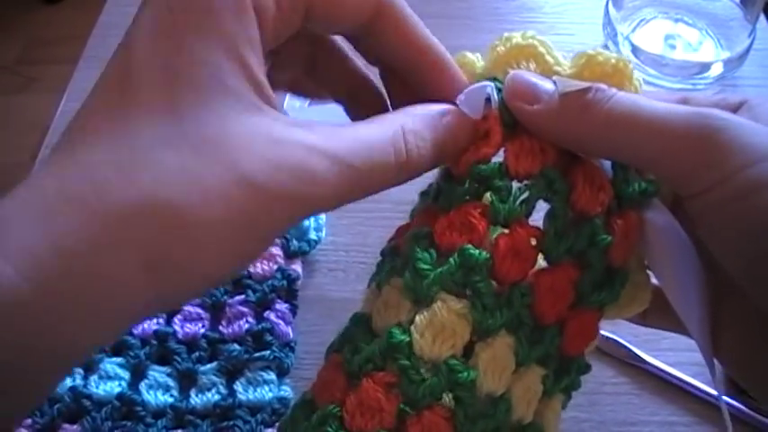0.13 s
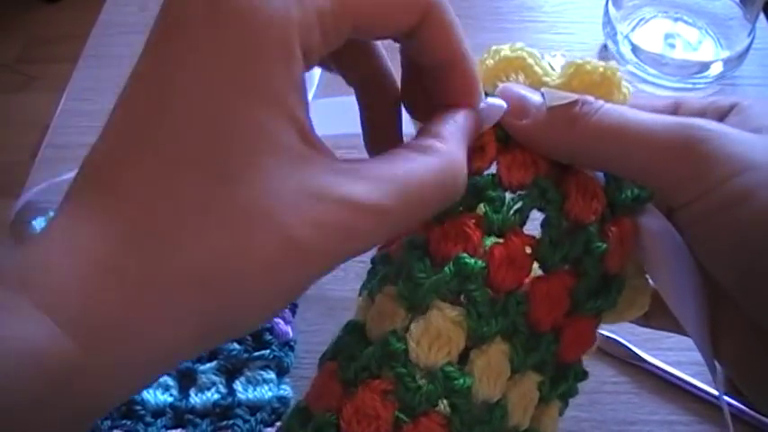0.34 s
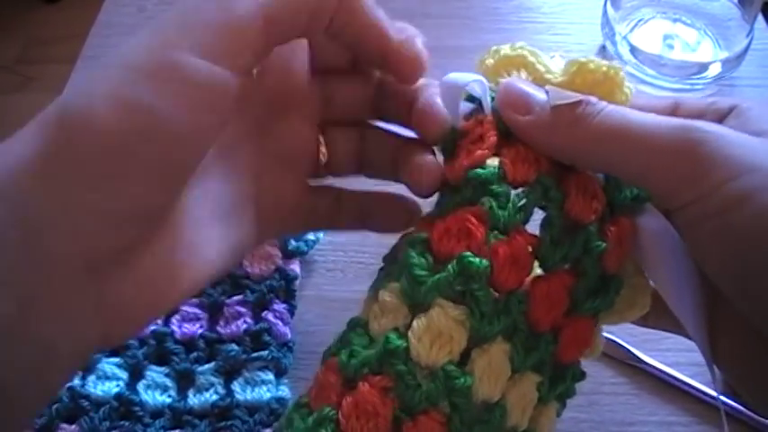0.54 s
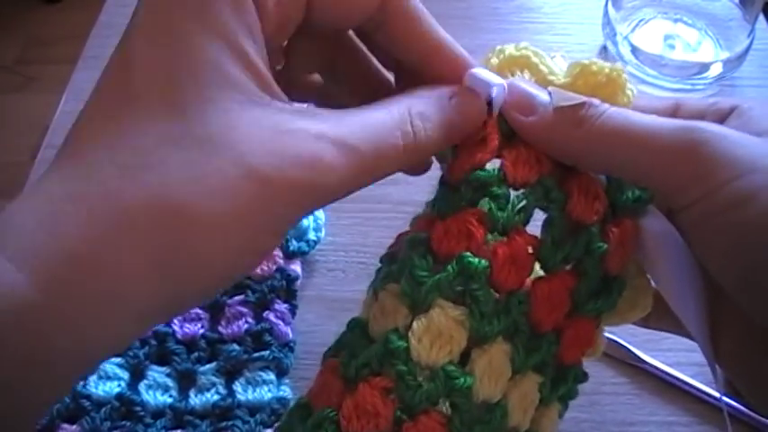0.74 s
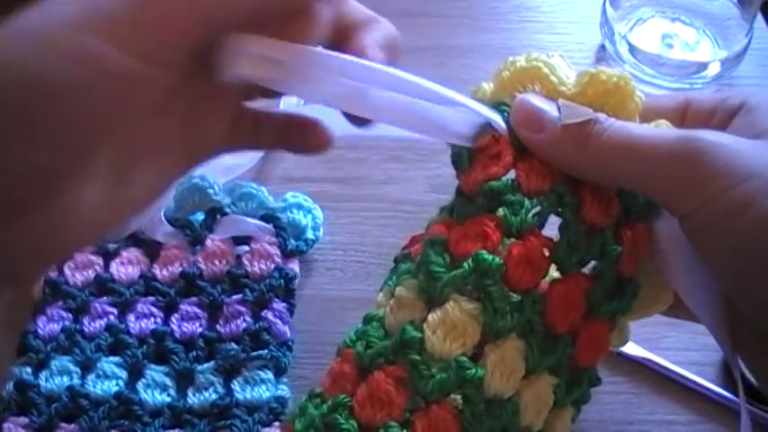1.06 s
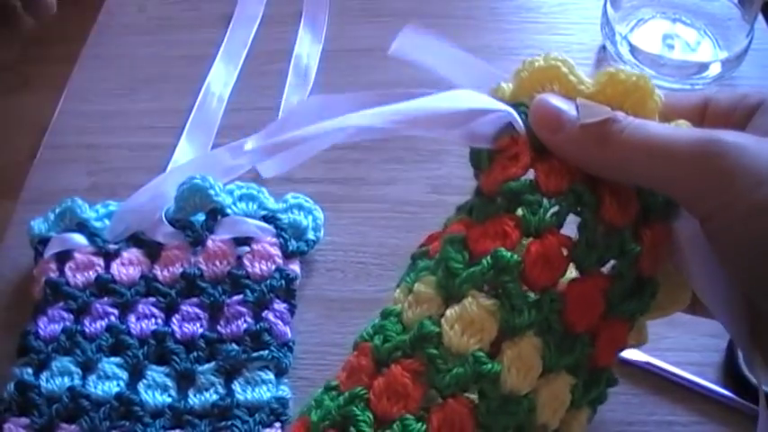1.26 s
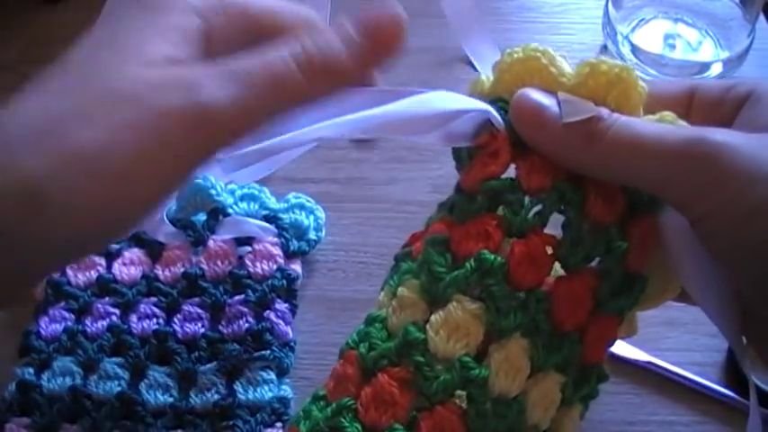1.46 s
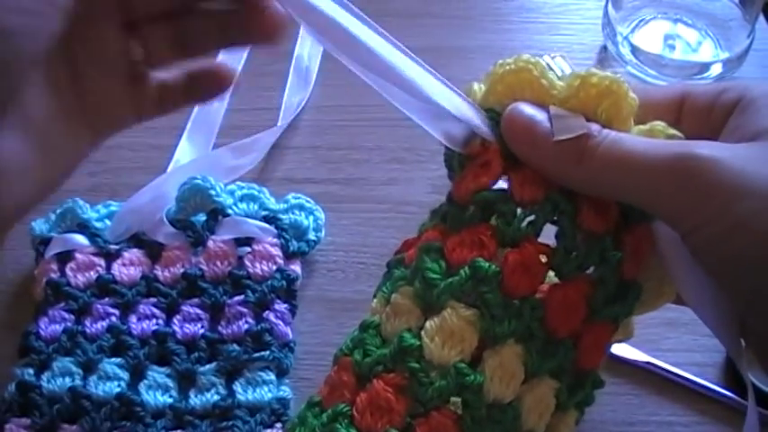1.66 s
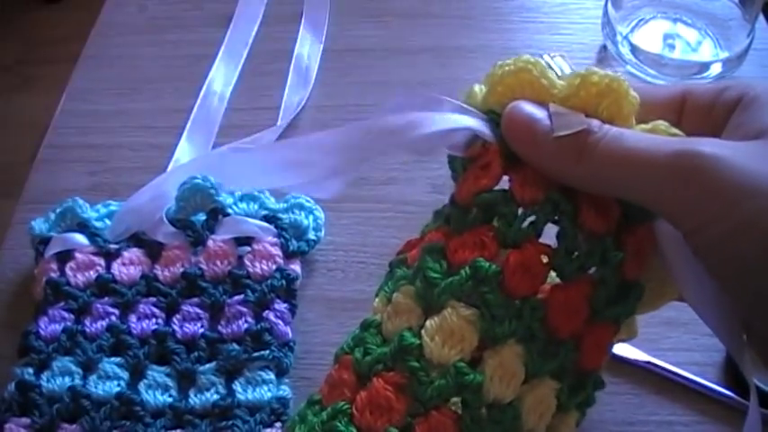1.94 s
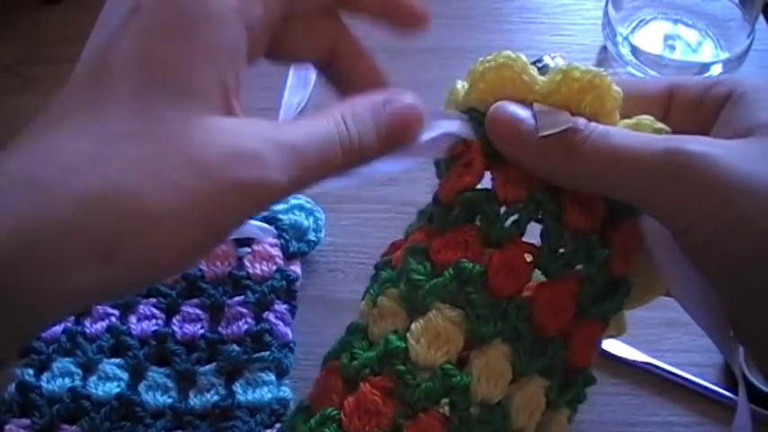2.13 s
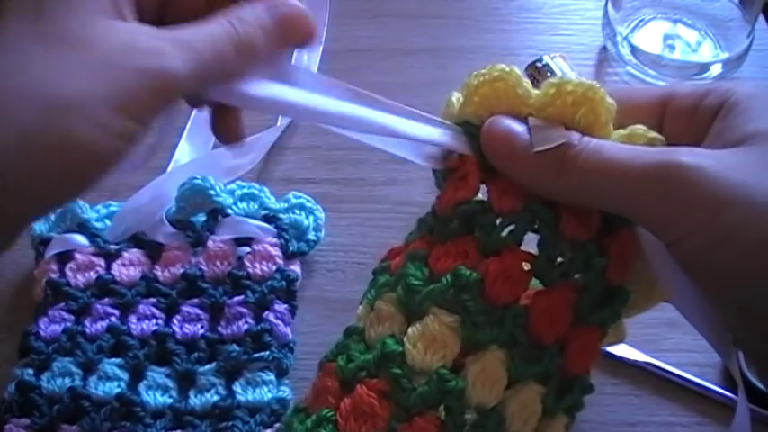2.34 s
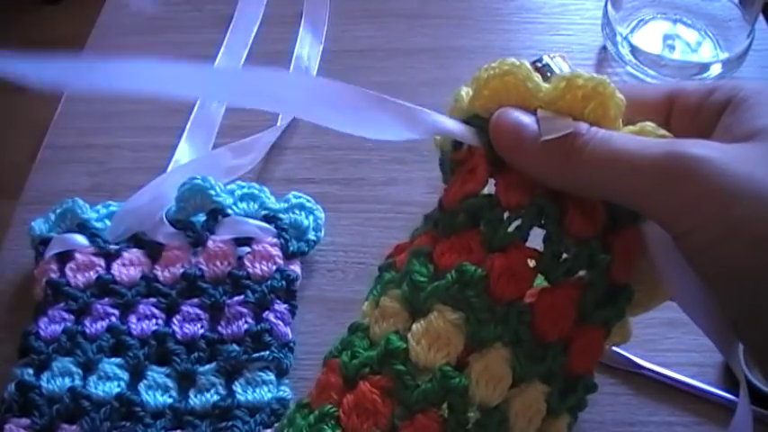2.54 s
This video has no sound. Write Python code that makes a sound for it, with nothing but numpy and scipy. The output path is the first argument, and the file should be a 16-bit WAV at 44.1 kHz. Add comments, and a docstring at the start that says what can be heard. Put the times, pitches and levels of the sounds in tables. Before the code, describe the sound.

Crisp, grainy swishes of satin ribbon drawn through crocheted yarn, with light table taps, indoors.

```python
"""Room tone and the faint whine of a camera's drive run throughout. From the start a satin ribbon is drawn
by hand through crocheted yarn: shaped noise, made grainy by fibres that catch and slip. Knuckles and hook
tap the wooden table as damped tones with a thud. Ticks, ribbon snaps, yarn pops, a brief scrape near 0.56 s
and a soft low puff near 1.2 s are coloured noise puffs. Near 1.9 s a soft low tone swells in a rumble, and
near the end a glass bowl rings once as damped tones. The room answers hands and table with a noise tail."""
import sys
import numpy as np
from scipy import signal
from scipy.fft import rfft, irfft, next_fast_len
from scipy.io import wavfile
from scipy.ndimage import uniform_filter1d, map_coordinates

SR = 44100
rng = np.random.default_rng(int(sys.argv[2]) if len(sys.argv) > 2 else 0)


def gain_from_decibels(decibels):
    """Convert decibel values to linear amplitude factors."""
    exponent = np.asarray(decibels, float) / 20
    return 10 ** exponent


def unload_wav(signal):
    """Save mono or channel-first audio to the path in sys.argv[1] as 16-bit WAV at rate SR, clipped to [-1, 1]."""
    wavfile.write(
        sys.argv[1],
        SR,
        np.round(np.clip(np.atleast_2d(signal).T, -1, 1) * 32767).astype(np.int16),
    )


N = 119070  # length in samples, 2.7 s


def unit(x):
    """Scales a signal to an rms of 1."""
    return x / np.sqrt(np.mean(x ** 2) + 1e-20)


def along(points, hz):
    """Reads a curve of (hz, value) points on a logarithmic frequency axis."""
    point_hz, value = np.transpose(points)
    return np.interp(np.log(hz + 1), np.log(point_hz + 1), value)


def wobble(rate):
    """A smooth random curve through `rate` random points a second."""
    knots = rng.standard_normal(int(N * rate / SR) + 4)
    return map_coordinates(knots, [np.arange(N) * rate / SR])


def filtered(x, response):
    """Filters x by a (possibly complex) gain for each frequency."""
    size = next_fast_len(N + SR // 2)
    gain = response(np.fft.rfftfreq(size, 1 / SR))
    return irfft(rfft(x, size) * gain, size)[..., :N]


def peak(f, hz, wide_hz):
    """Response of a resonance at hz, about wide_hz wide, that rings only after it is struck."""
    return 1j * f * wide_hz / (hz * hz - f * f + 1j * f * wide_hz)


def rush(spectrum, side_db, patchy_db, grain=1):
    """Coloured stereo noise, mid rms 1, with random loud and soft patches in time and pitch."""
    z = signal.stft(rng.standard_normal((2, N)), nperseg=256)[2]
    patches = uniform_filter1d(rng.standard_normal(z.shape[1:]), 4, 0)  # smooth over frequency
    patches = uniform_filter1d(patches, 8, 1)  # smooth over time
    patchy = signal.istft(z * gain_from_decibels(patchy_db * unit(patches)), nperseg=256)[1][:, :N]

    def colour(hz):
        return gain_from_decibels(along(spectrum, hz)) * [hz ** 0, gain_from_decibels(along(side_db, hz))]

    mid, side = filtered(grain * patchy, colour)
    return np.array([mid + side, mid - side]) / np.sqrt(np.mean(mid ** 2))


# Colour of the quiet room: hz, level_db (per Hz, relative)
ROOM_COLOUR = [(25, -36), (120, -15.5), (212, -9), (560, -5.5), (1260, -4.5), (1900, -9.5), (2160, -8),
               (2800, -12), (3500, -13), (4600, -16), (7500, -15), (11000, -20.5), (15000, -34),
               (16000, -32)]
# Stereo width of room tone and rumble: hz, side_over_mid_db
ROOM_WIDTH = [(60, -18), (110, 9), (200, 9), (380, 10.5), (700, 9), (1290, 5), (2380, 4.5), (4400, 3.5),
              (8120, -2), (15000, 3)]


def room_tone():
    """The steady hush of the room, as wide coloured noise."""
    return gain_from_decibels(-67.5) * rush(ROOM_COLOUR, ROOM_WIDTH, patchy_db=1.9)


# Tones of the camera's drive: pitch_hz, level_db (before a 6 dB lift)
DRIVE_TONES = [(727, -85.5), (1459, -82.5), (2186, -78.5), (3644, -84), (15622, -93)]


def drive_whine():
    """The drive's thin tones, each slightly unsteady in level and phase."""
    t = np.arange(N) / SR
    whine = 0
    for hz, db in DRIVE_TONES:
        level = gain_from_decibels(db + 6.0 + 0.66 * wobble(12.9))
        turns = hz * t + rng.random() + 0.016 * wobble(19)
        whine = whine + level * np.sin(2 * np.pi * turns)
    return whine


def slips():
    """Fibres catching: tension builds and lets go at once, in uneven sizes, over a steady share."""
    slips_per_s, build_s, spread_db, share = 1400, 0.00058, 6.5, 0.26
    sizes = gain_from_decibels(spread_db * np.clip(rng.standard_normal(N), -2, 2))
    hits = (rng.random(N) < slips_per_s / SR) * sizes
    decays = unit(signal.lfilter([1], [1, -np.exp(-1 / (build_s * SR))], hits))
    return 1 - share + share * decays[::-1]  # played backwards, each decay becomes a build-up


# Sliding of ribbon and fingers: time_s, fizz_db, body_over_fizz_db, air_over_fizz_db
SLIDING = [(0.0, -63, 2.5, -12), (0.08, -74.5, 0.5, -27), (0.13, -79, -16, -10), (0.15, -60.5, 1.5, -14),
           (0.19, -73.5, -5, -8), (0.23, -58.5, -2, -20), (0.310, -59, -2.5, -16), (0.330, -66.5, -1, -22),
           (0.37, -62, -2, -25), (0.4, -55, -3, -5), (0.44, -57.5, -2, -8), (0.514, -47, -7, -16),
           (0.520, -63, 2.5, -11), (0.588, -53.5, -9, -17), (0.66, -69, -0.5, -16), (0.68, -56, -10.5, -14),
           (0.710, -61.5, 1, -20), (0.726, -47.5, -8.5, -12), (0.742, -63.5, -2.5, -17),
           (0.775, -53.5, -4.5, -12), (0.86, -54, 0.5, -13), (0.94, -43.5, -8.5, -14),
           (1.0, -43.5, -6, -7.5), (1.102, -39, -9.5, -9.5), (1.13, -60, -1, -25), (1.18, -70.5, 1.5, -10),
           (1.19, -53, -4, -34), (1.34, -79.5, 2.5, -8), (1.510, -78.5, -2, -10), (1.520, -65.5, -3, -12),
           (1.546, -41, -14, -17), (1.552, -72, 8, -17), (1.569, -43, -8.5, -10), (1.65, -37, -10.5, -12),
           (1.731, -41, -7, -3.5), (1.741, -34, -8.5, -13), (1.764, -56.5, -1.5, 3),
           (1.773, -44, -3.5, -22), (1.788, -60.5, -7, -9), (1.855, -68.5, -1.5, -20),
           (1.885, -60, -6, -10), (1.930, -72, 1.5, -17), (1.965, -66, -3, -14), (1.995, -71.5, -2, -21),
           (2.154, -78, -5, -18), (2.159, -49.5, -11, -20), (2.171, -53, -6, -24), (2.208, -39, -12.5, -11),
           (2.236, -41, -12, -18), (2.247, -47, -6, -23), (2.3, -39, -13, -21), (2.39, -36, -14, -9),
           (2.41, -38, -10.5, -13), (2.47, -37, -10.5, -15), (2.502, -40, -7, -14), (2.510, -49, -3, -8),
           (2.56, -44.5, -11, -11), (2.58, -64, 2, -13), (2.66, -69, -2.5, -15), (2.7, -64.5, 2, -19)]
# Colour of the fine fizz before its tilt: hz, level_db (per Hz, relative)
FIZZ_COLOUR = [(2710, -48), (4600, -14), (5720, -4.5), (6260, -2), (7970, 4), (9510, 2.5), (10300, -1.5),
               (11300, -9.5), (14700, -21.5), (22000, -120)]
# Colour of the duller body of the rustle: hz, level_db (per Hz, relative)
BODY_COLOUR = [(150, -68), (250, -14.5), (531, -11), (809, -1.5), (974, -7), (1950, -1.5), (2930, -4),
               (3610, 0.5), (4800, -7), (6240, -7), (10600, -120)]
# Colour of the top air: hz, level_db (per Hz, relative)
AIR_COLOUR = [(6470, -25), (11000, 10), (13600, 7), (15000, -3), (16000, -29)]
# Stereo width of the sliding: hz, side_over_mid_db
SLIDING_WIDTH = [(110, -1), (200, -5), (380, -1), (700, -11), (1290, -16), (2380, -80), (4400, -66),
                 (8120, -7.5), (15000, -9)]
# Pitch that steers the fizz between dull and sharp: time_s, pitch_hz
FIZZ_PITCH = [(0.0, 7560), (0.31, 7970), (0.58, 7630), (1.55, 8300), (1.74, 7530), (2.15, 7500),
              (2.2, 8900), (2.66, 7560), (2.7, 8200)]


def ribbon():
    """Sliding drives grainy fizz, body and air; the fizz fades between a dull and a sharp colour."""
    dull_hz, sharp_hz, tilt_db_per_octave = 7340, 9060, 8.5
    time_s, fizz_db, body_db, air_db = np.transpose(SLIDING)
    t = np.arange(N) / SR
    fine_grain = slips()
    flutter = gain_from_decibels(0.66 * wobble(60))

    def tilted_fizz(slope):
        colour = [(hz, db + slope * np.log2(hz)) for hz, db in FIZZ_COLOUR]
        return rush(colour, SLIDING_WIDTH, 2.0, fine_grain)

    dull, sharp = tilted_fizz(-tilt_db_per_octave), tilted_fizz(tilt_db_per_octave)
    pitch_hz = np.interp(t, *np.transpose(FIZZ_PITCH))
    fade = np.pi / 2 * np.clip((pitch_hz - dull_hz) / (sharp_hz - dull_hz), 0, 1)
    fizz = np.cos(fade) * dull + np.sin(fade) * sharp
    body = gain_from_decibels(np.interp(t, time_s, body_db)) * rush(BODY_COLOUR, SLIDING_WIDTH, 1.4, slips())
    air = gain_from_decibels(np.interp(t, time_s, air_db)) * rush(AIR_COLOUR, SLIDING_WIDTH, 1.0, fine_grain)
    return flutter * gain_from_decibels(np.interp(t, time_s, fizz_db)) * (fizz + body + air)


# How fast the room's answer dies: hz, t60_s (time to fall 60 dB)
ROOM_DECAY = [(300, 1), (2000, 0.41), (10000, 0.19)]


def walls(x):
    """The room's answer: a noise tail in which each frequency dies at its own speed."""
    hz, t, z = signal.stft(rng.standard_normal((2, SR // 2)), SR, nperseg=256)
    fall = gain_from_decibels(-60 * t / along(ROOM_DECAY, hz)[:, None])
    tail = signal.istft(z * fall, SR, nperseg=256)[1]
    late = np.pad(x, (200, 0))[None]  # the answer comes 200 samples later
    return signal.fftconvolve(late, tail / np.linalg.norm(tail[0]), axes=1)[:, :N]


def puff(s, db, hz, wide_hz, t60):
    """A sharp release and a dying noise burst through a broad, steep resonance."""
    x, t = np.zeros(N + SR), np.arange(SR // 8) / SR
    burst = rng.standard_normal(len(t)) * gain_from_decibels(-60 * t / t60)
    burst = burst * (1 - np.exp(-t / 0.0017))  # soft onset
    release = 6 * (t == 0)  # a single-sample click
    x[round(s * SR):][:len(t)] = burst + release
    # the last factor thins out the lows
    x = filtered(x[:N], lambda f: peak(f, hz, wide_hz) ** 2 * (f / (f + 250)) ** 2)
    return gain_from_decibels(db) * x / np.abs(x).max()


def ring(s, modes):
    """A struck object: damped tones (pitch_hz, level_db, t60_s) that start softly at s."""
    t = np.clip(np.arange(N) / SR - s, 0, None)
    tones = sum(gain_from_decibels(db - 60 * t / t60) * np.sin(2 * np.pi * hz * t) for hz, db, t60 in modes)
    return tones * (1 - np.exp(-t / 0.0031))


# Knuckles and hook on the table: start_s, level_db, favoured_pitch_hz
TABLE_TAPS = [(0.092, -50, 570), (0.124, -42, 790), (1.15, -43.5, 775), (1.198, -40.5, 630),
              (1.204, -38.5, 1280), (2.403, -42.5, 390), (2.407, -40, 1240), (2.483, -37.5, 920),
              (2.487, -37.5, 405)]
# Tones of the wooden table: pitch_hz, level_db (relative to the tap), t60_s
TABLE_TONES = [(364, -3, 0.07), (548, -4, 0.083), (848, -4, 0.075), (1260, -4, 0.065), (2050, -5, .05)]


def taps():
    """Each tap thuds and wakes most the table tones near its own pitch."""
    reach_octaves, thud_db = 0.4, -6
    total = 0
    for s, db, near_hz in TABLE_TAPS:
        modes = []
        for hz, level, t60 in TABLE_TONES:
            distance = np.log2(hz / near_hz) / reach_octaves
            modes.append((hz, db + level - 6 * distance ** 2, t60))
        thud = puff(s, db + thud_db, near_hz, 1.33 * near_hz, 0.082)
        total = total + ring(s, modes) + thud
    return total


# Fine fibre and nail ticks: start_s, peak_db
FINE_TICKS = [(0.146, -47), (1.428, -52), (1.513, -36), (2.0112, -53), (2.033, -47), (2.061, -47)]


def ticks():
    """Fibres and nails tick: very short, bright noise puffs."""
    return sum(puff(s, db, hz=8200, wide_hz=7700, t60=0.0099) for s, db in FINE_TICKS)


# Ribbon snaps, yarn pops, a brief scrape near 0.56 s and a soft low puff near 1.2 s:
# start_s, peak_db, pitch_hz, t60_s
COLOURED_PUFFS = [(0.509, -40, 1840, 0.025), (0.561, -43, 3800, 0.059), (0.61, -44.5, 1250, 0.032),
                  (0.719, -45, 1680, 0.074), (1.026, -32.5, 2000, 0.035), (1.104, -34, 2050, .024),
                  (1.19, -37, 1430, 0.0076), (1.201, -48, 306, 0.23), (1.538, -41.5, 1210, 0.011),
                  (1.6845, -33.5, 1290, 0.0095), (1.742, -46, 1960, 0.016), (1.7475, -27.5, 1270, 0.015),
                  (2.2, -38, 1410, 0.043), (2.4833, -29, 1430, 0.031), (2.491, -32.5, 1740, 0.14)]


def snaps_pops_scrape_and_puff():
    """Ribbon snaps, yarn pops, a brief scrape and a soft low puff: noise bursts, each with its own colour."""
    return sum(puff(s, db, hz, 1.29 * hz, t60) for s, db, hz, t60 in COLOURED_PUFFS)


# Colour of the low rumble: hz, level_db (per Hz, relative)
RUMBLE_COLOUR = [(40, -26), (70, -14), (130, 4), (230, -2), (400, -40)]


def low_swell():
    """A brief soft low tone, wavering in level, inside a longer swell of rumbling noise."""
    middle_s, tone_width_s, rumble_width_s = 1.855, 0.05, 0.22
    t = np.arange(N) / SR
    tone_swell = np.exp(-((t - middle_s) / tone_width_s) ** 2)
    tone = gain_from_decibels(-71 + 2.5 * wobble(39.3)) * tone_swell * np.sin(2 * np.pi * 210 * t)
    rumble_swell = np.exp(-((t - middle_s) / rumble_width_s) ** 2)
    rumble = gain_from_decibels(-82.5) * rumble_swell * rush(RUMBLE_COLOUR, ROOM_WIDTH, patchy_db=1.5)
    return tone + rumble


# Tones of the glass bowl: pitch_hz, level_db, t60_s
BOWL_TONES = [(1669, -51, .6), (1684, -54, .6), (1693, -48, .28), (1976, -58, .25)]


def bowl():
    """The glass bowl rings once; close pairs of tones beat against each other."""
    return ring(2.484, BOWL_TONES)


def scene():
    """Hands and table close by, the room around them; the table feeds the room more than the ribbon."""
    hands = ribbon() + ticks() + snaps_pops_scrape_and_puff()
    knocks = taps()
    answer = gain_from_decibels(-14.5) * walls(hands.mean(0) + gain_from_decibels(2.5) * knocks)
    background = room_tone() + drive_whine() + low_swell()
    return hands + knocks + bowl() + answer + background


# Uneven microphones: hz, lean_db (left is lowered and right is raised by this)
MICROPHONE_LEAN = [(1000, 0.2), (8000, 0.24), (13000, 1)]


def microphones(dry):
    """Two slightly unequal microphones: the right one is louder, most of all in the treble."""
    return filtered(dry, lambda hz: gain_from_decibels(along(MICROPHONE_LEAN, hz) * [[-1], [1]]))


def roll_off(x):
    """The treble ends steeply here."""
    return signal.sosfilt(signal.butter(12, 15850, fs=SR, output="sos"), x)


def record(dry):
    """Picks up the scene with the two microphones and returns the finished sound."""
    heard = microphones(dry)
    return roll_off(heard)


dry = scene()
out = record(dry)
unload_wav(out)
```